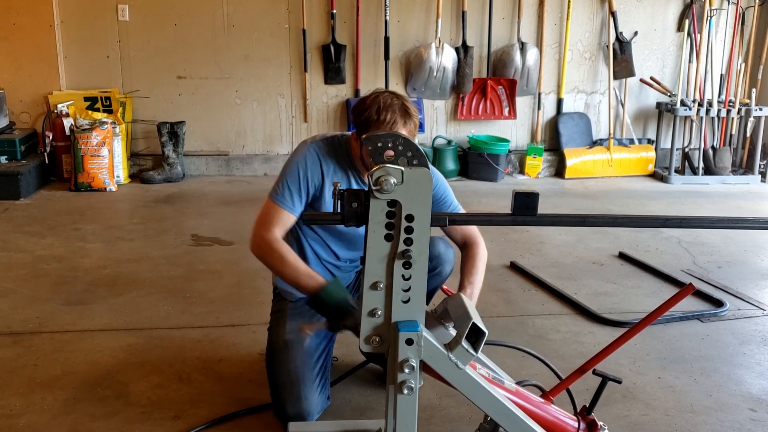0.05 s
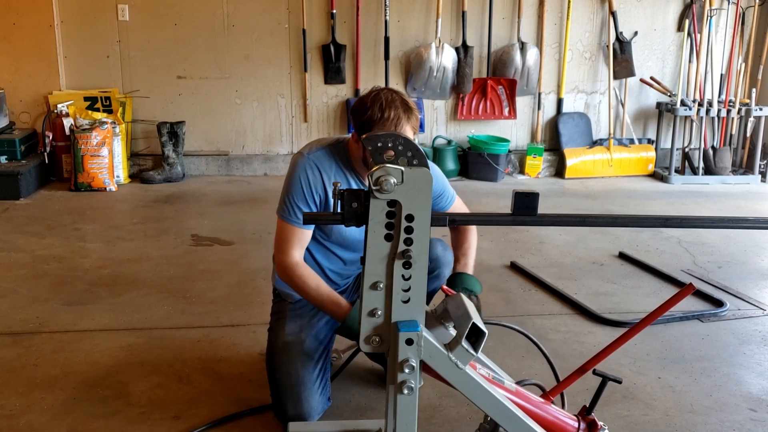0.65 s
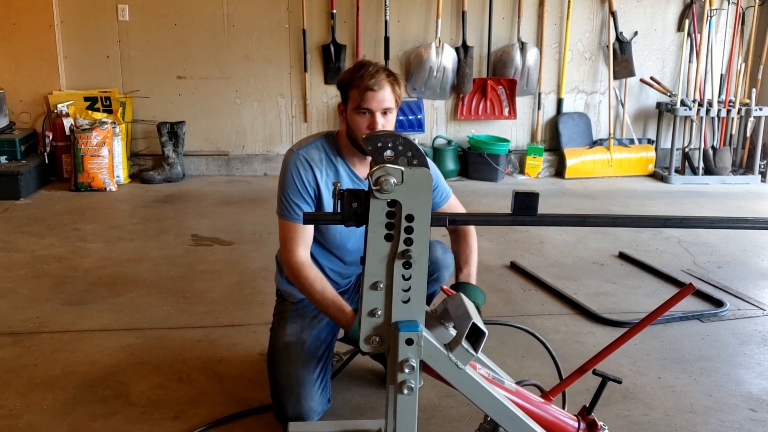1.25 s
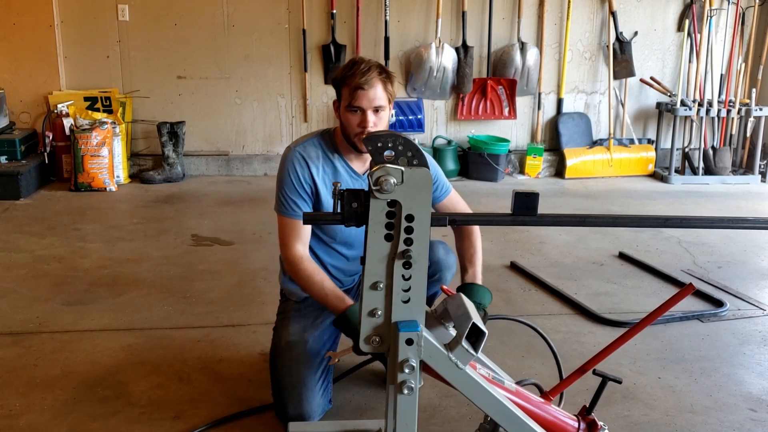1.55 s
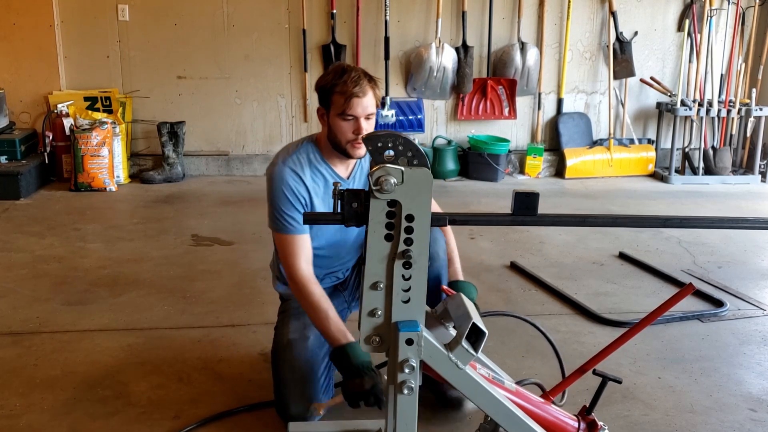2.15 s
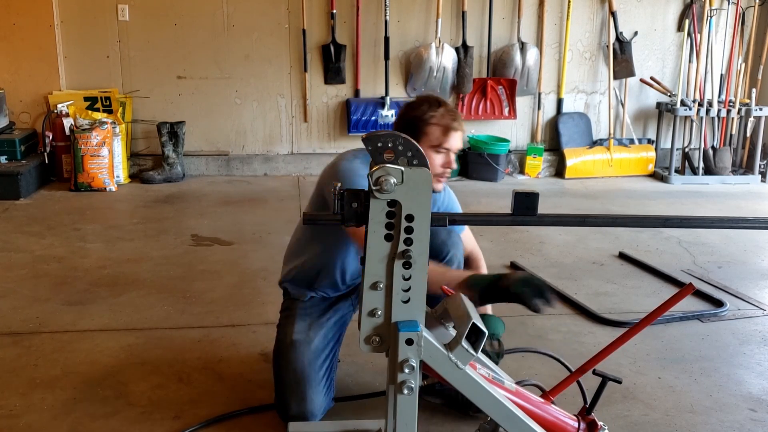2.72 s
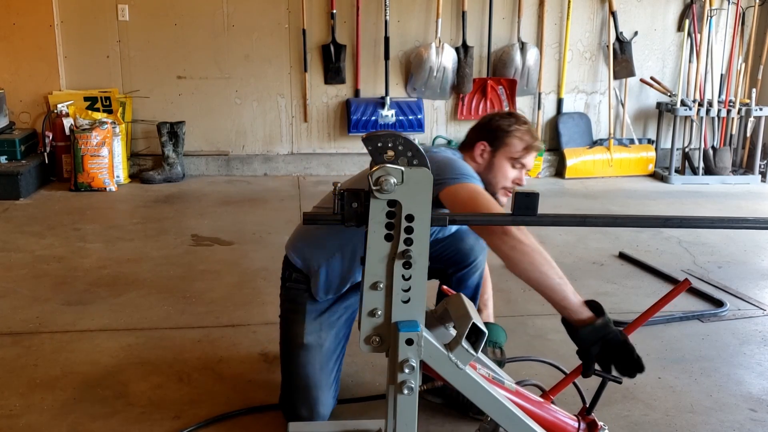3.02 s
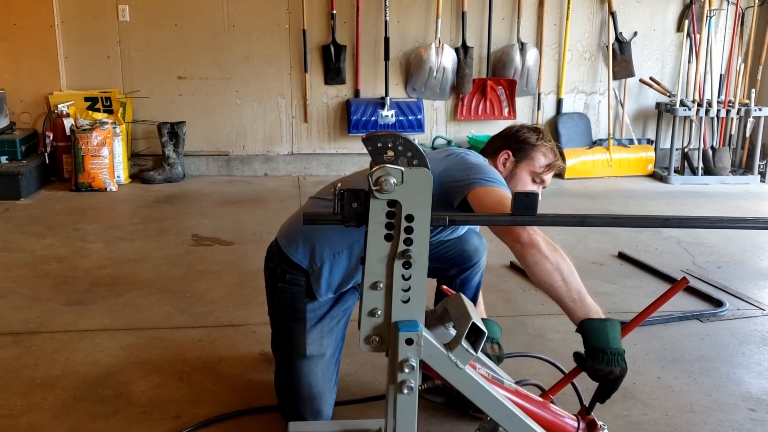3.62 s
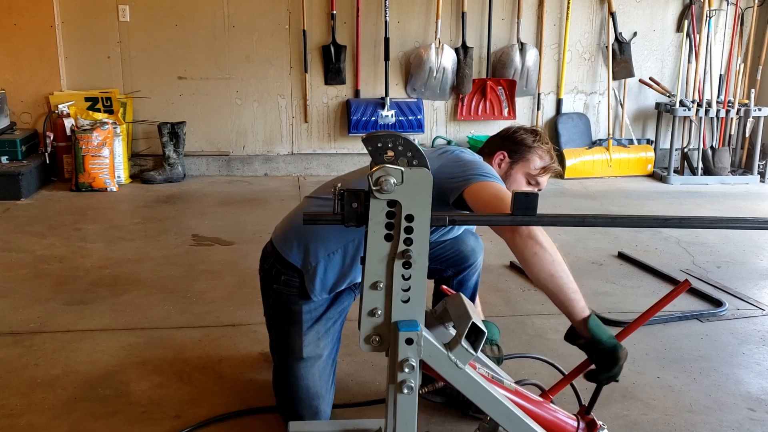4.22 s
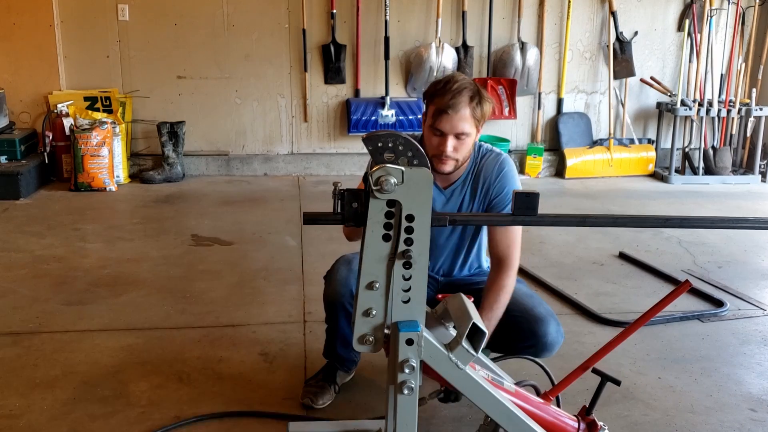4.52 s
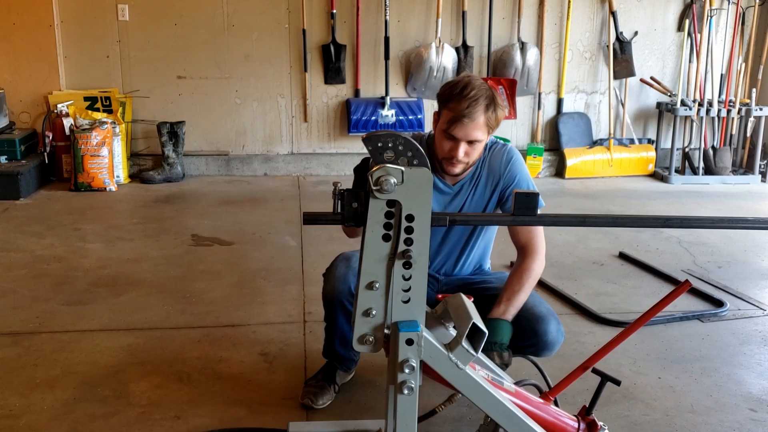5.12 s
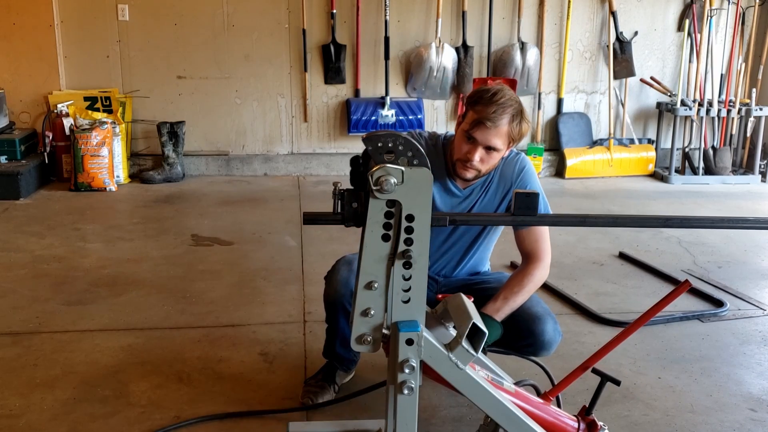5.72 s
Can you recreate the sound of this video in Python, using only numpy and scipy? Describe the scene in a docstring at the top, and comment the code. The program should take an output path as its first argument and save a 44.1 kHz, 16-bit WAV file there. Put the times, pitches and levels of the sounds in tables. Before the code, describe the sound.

Air hisses thinly from a valve, then an air-driven hydraulic pump chatters for half a second with rapid thumps and harsh puffs. A few dull knocks lead into a loud gush of air with a high squeal. A faint leak follows, then a stronger, hollow hiss and a second run of chatter. Everything sits well to the left of the microphone in a garage, over a faint low drone.

```python
"""Air-driven hydraulic pump in a garage

The pump bends steel tube, well to the left. Leaking air hisses at the valve; in two runs the piston
chatters at about twelve strokes a second, each a thump and a puff of turbulent exhaust. Between the
runs the valve vents with a gush and a self-excited squeal. A distant machine drones throughout."""
import sys
import numpy as np
from scipy import signal
from scipy.fft import rfft, irfft, next_fast_len
from scipy.io import wavfile
from scipy.ndimage import map_coordinates

SR = 44100
rng = np.random.default_rng(int(sys.argv[2]) if len(sys.argv) > 2 else 0)


def transcribe(signal):
    """Save signal, clipped to [-1, 1], as a 16-bit WAV file at the path in sys.argv[1]."""
    frames = np.atleast_2d(signal).T
    limited = np.clip(frames, -1, 1)
    pcm = np.round(limited * 32767).astype(np.int16)
    wavfile.write(sys.argv[1], SR, pcm)


N = 262924

# runs of the pump: (air on [s], first stroke [s], air off [s], stroke period [s])
PUMP_RUNS = [(1.462, 1.523, 2.06, 0.0815), (5.242, 5.247, 5.96, 0.0796)]
THROTTLE_S, THROTTLE_END_S = 4.553, 5.25  # the valve is held half open
VENT_S, VENT_END_S = 2.3425, 2.674  # the release valve lets a first stream through
GUSH_S, GUSH_END_S = 2.447, 2.583  # it opens fully
VENT_FALL_DB_PER_S = 105


def pump():
    """Impacts excite resonances: the piston strikes, dumps a turbulent puff and clacks back."""
    # resonances of garage, pump body and returning piston: (frequency [Hz], bandwidth [Hz], gain [dB])
    room_modes = [(58, 21, -4.5), (85, 30, -5), (128, 17.3, -2.5), (157, 48, -6.5), (250.5, 50, -8.5),
                  (381, 67, -13)]
    body_modes = [(6180, 340, -4), (6780, 740, -9.5), (4040, 270, -8.5), (1770, 110, -6.5)]
    return_modes = [(173, 78, -2), (374, 105, -4), (910, 580, -12)]
    # spectra of each puff, its bright jet and the steady exhaust: (frequency [Hz], relative density [dB])
    puff_spectrum = [(500, -11.5), (800, -12), (1150, -3), (1800, 0.5), (2400, -5), (4000, -5.5),
                     (8000, -13.5), (15800, -7)]
    jet_spectrum = [(2000, -28), (4000, -11), (6400, 3), (8300, -2.5), (11000, 0.5), (15500, 2.5)]
    exhaust_spectrum = [(180, -32), (330, 0.5), (450, -5), (740, -4), (1050, -3.5), (1800, -5), (2400, -5),
                        (2900, -2.5), (5200, 0), (6400, 3), (8500, -6.5), (11600, -0.5), (15800, -5)]
    hits = strokes()
    thump = amp(-12.5) * thumps(hz=111, swell=0.0055, delay=0.0012)
    rebound = amp(-23.5) * thumps(hz=124.7, swell=0.013, delay=0.017)
    rebound += amp(-17) * thumps(hz=113.4, swell=0.006, delay=0.0475)
    boom = amp(-25) * bursts(hits, rise=0.019, t60=0.67, hold=0.037) * rush(body(room_modes))
    ping = amp(-15) * bursts(hits, rise=0.00044, t60=0.049, delay=0.0016) * rush(body(body_modes))
    clack = amp(-23.5) * bursts(hits, rise=0.00073, t60=0.07, delay=0.036) * rush(body(return_modes))
    puff = amp(-20.5) * bursts(hits, rise=0.0017, t60=0.25, hold=0.032) * rush(colour(puff_spectrum))
    jet_envelope = amp(-15) * bursts(hits, rise=0.0069, t60=0.33, delay=0.0032, hold=0.019)
    jet = jet_envelope * rush(colour(jet_spectrum))
    flow = motor_air() * rush(colour(exhaust_spectrum))
    sputter = amp(1.06 * wobble(350))
    exhaust = sputter * (amp(0.83 * wobble(25)) * puff + jet + flow)
    return thump + rebound + boom + ping + clack + exhaust


def strokes():
    """Periodic excitation, (time [s], level [dB]): a hard first stroke, then weakening under load."""
    kick_db, tire_db_per_s = 2, 1.3
    return [(s, kick_db * (s == first) - tire_db_per_s * (s - first))
            for _, first, off, period in PUMP_RUNS for s in np.arange(first, off, period)]


def thumps(hz, swell, delay):
    """Volume displacement: each stroke shoves out a slug of air, a pressure swing of a few cycles."""
    out = np.zeros(N + SR)
    t = np.arange(SR // 10) / SR
    envelope = (t / swell * np.exp(1 - t / swell)) ** 2
    for s, db in strokes():
        swing = envelope * np.sin(2 * np.pi * hz * (1 + 0.022 * rng.standard_normal()) * t)
        out[round((s + delay) * SR):][:len(t)] -= amp(db) * swing
    return out[:N]


def motor_air():
    """Pressure-driven flow: the envelope of the motor's air starts at once and sags with the supply."""
    start_db, sag_db_per_s = -19.5, 4.5
    return sum(held(on, off, attack=0.0052, fall_db_per_s=53)
               * amp(start_db - sag_db_per_s * np.maximum(clock() - on, 0))
               for on, _, off, _ in PUMP_RUNS)


def main_tones():
    """Flow-excited modes: the vent sounds three whistles; full flow chokes the lowest, feeds the others."""
    # whistles: (frequency [Hz], left minus right [dB])
    whistles = [(4347, 16), (6374, 13), (6500, 14)]
    # their response to the air: (level [dB], release time [s], change at full flow [dB])
    drive = [(-22.5, 2.755, -10), (-26.5, 2.8, 15.5), (-16.5, 2.707, 5)]
    full = opening(attack=0.023) ** 2
    return sum(amp(db + change_db * full) * held(VENT_S, stop, attack=0.006, fall_db_per_s=95)
               * tone(hz, left_db, scatter=0.57, waver_hz=6, chatter=0.19)
               for (hz, left_db), (db, stop, change_db) in zip(whistles, drive))


def side_tones():
    """Weaker modes share one swell; once the air is spent, damping takes the shortest waves first."""
    # side modes of the valve: (frequency [Hz])
    mode_hz = [1170, 1320, 2631, 3198, 5705, 8614, 8930, 10873, 11809, 12673, 12865, 13302, 15398]
    # for each mode: (level [dB], lag behind the swell [s], left minus right [dB])
    modes = [(-48.5, 0.076, 19), (-40, -0.2, 18), (-32.5, -0.078, 18), (-37.5, 0.17, 16), (-28.5, 0.11, 23),
             (-26.5, 0.081, 10), (-23.5, 0.099, 21), (-20.5, 0.16, 13), (-23, .13, 29), (-22.5, 0.011, 1),
             (-19, 0.024, 10), (-26, .01, 15), (-27.5, 0.2, 23)]
    full_s, fade_s, spent_s = 2.495, 2.658, 2.864
    swell_db_per_s, fade_db_per_s, damping_db_per_s = 29, 82, 200
    t = clock()
    starved_db = 11.5 * np.clip((GUSH_S - t) / 0.02 + 1, 0, 1)  # weaker before the gush
    spent_db = damping_db_per_s * np.maximum(t - spent_s, 0)
    sides = 0
    for hz, (db, lag, left_db) in zip(mode_hz, modes):
        unrest = hz / mode_hz[-1]  # short waves are the least steady
        swell_db = -swell_db_per_s * np.maximum(full_s + lag - t, 0)
        fade_db = -fade_db_per_s * np.maximum(t - lag - fade_s, 0)
        envelope = amp(db + swell_db + fade_db - unrest * starved_db - unrest ** 2 * spent_db)
        sides += envelope * tone(hz, left_db, scatter=0.32 + 0.45 * unrest,
                                 waver_hz=8 * unrest, chatter=0.53 * unrest)
    onset = np.clip((t - 2.35) / 0.017, 0, 1)
    return onset * sides


def tone(hz, left_db, scatter, waver_hz, chatter):
    """Self-excited oscillation: a whistle chatters, and reflections make it flicker at each ear."""
    phase = 2 * np.pi * np.cumsum(hz + waver_hz * wobble(40)) / SR
    flicker = np.array([wobble(55) + 1j * wobble(55), wobble(55) + 1j * wobble(80)])
    modulation = 1 + scatter * flicker + chatter * wobble(260)
    return pan(left_db) * unit(np.real(modulation * np.exp(1j * phase)))


def vent():
    """Cavity resonance: a ragged gush rings the valve, most at full flow, and roughens the squeal."""
    # venting air: (frequency [Hz], relative density [dB])
    spectrum = [(30, -15), (150, -11), (900, -21), (2500, -16.5), (4400, -15.5), (5200, -18), (6400, -11),
                (7700, -20), (10000, -17.5), (12800, -15), (14500, -15), (15800, -17)]
    # cavities of the valve: (frequency [Hz], bandwidth [Hz], gain [dB])
    cavities = [(485, 160, 4.5), (1155, 100, 1), (1960, 180, 3), (2625, 76, 4), (4350, 210, -1)]
    stream = amp(-29) * held(VENT_S, VENT_END_S, attack=0.002, fall_db_per_s=VENT_FALL_DB_PER_S)
    trail = amp(-28.5) * held(GUSH_S, 2.712, attack=0.0025, fall_db_per_s=500)  # until it snaps shut
    flow = np.linalg.norm([stream, trail, amp(-18.5) * opening(attack=0.018)], axis=0)
    gush = rush(colour(spectrum)) + amp(-13.5 + 5 * opening(attack=0.06)) * rush(body(cavities))
    rasp = amp(6.5) * flow / flow.max() * rush(body([(6446, 65, 0)]))  # between the upper whistles
    return flow * (amp(2 * wobble(200)) * gush + rasp)


def opening(attack):
    """Share of the release valve's full flow, 0-1, building up with time constant attack [s]."""
    return held(GUSH_S, GUSH_END_S, attack, fall_db_per_s=VENT_FALL_DB_PER_S)


def leak():
    """Turbulent jet noise: escaping air is a thin seep at low flow, a fuller hiss as the flow grows."""
    # the valve is cracked open: (opens [s], shuts [s], level [dB])
    cracks = [(0, 1.2, -29.5), (0.19, 1.16, -28.5)]
    # the leak at high and at low flow: (frequency [Hz], relative density [dB])
    hiss_spectrum = [(350, -48), (600, -23.5), (1200, -19), (2200, -13.5), (2800, -8.5), (3400, -3),
                     (4100, -5), (5500, -6), (6900, 1.5), (7400, 1), (8100, -11), (11200, -0.5),
                     (13300, 1.5), (15800, -4)]
    seep_spectrum = [(350, -52), (650, -18), (1300, -24.5), (2200, -27), (2900, -7), (3400, -5.5),
                     (5500, -10.5), (6900, -2), (8500, -13.5), (11200, -3.5), (13300, 1.5), (15800, -2.5)]
    seep = amp(-36.5) * held(-1, THROTTLE_S, attack=0.01, fall_db_per_s=400)
    leaks = [amp(db) * held(on, off, attack=0.0089, fall_db_per_s=67) for on, off, db in cracks]
    flow = np.linalg.norm([seep] + leaks, axis=0) * amp(0.59 * wobble(16))
    full = np.clip((20 * np.log10(flow + 1e-9) + 38) / 9, 0, 1)
    return flow * (np.sqrt(full) * rush(colour(hiss_spectrum))
                   + np.sqrt(1 - full) * rush(colour(seep_spectrum)))


def throttle():
    """Flow-excited resonance: the half-open valve blows a hollow note through the stalled motor."""
    # throttled air: (frequency [Hz], relative density [dB])
    spectrum = [(290, -37), (550, -15), (760, -20), (1350, -21), (2300, -17), (3350, -6), (5400, -9.5),
                (6900, 0.5), (8200, -10), (9900, -5), (11400, 3.5), (14000, 0), (15800, -3.5)]
    # resonances of the stalled motor: (frequency [Hz], bandwidth [Hz], gain [dB])
    motor_modes = [(60.4, 21, -2.5), (101, 22.4, -2), (128.6, 20.5, 1.5), (234, 120, -12), (386.4, 20, -7),
                   (767, 226, -17)]
    flow = held(THROTTLE_S, THROTTLE_END_S, attack=0.002, fall_db_per_s=400)
    flow *= amp(-25 + 3.5 * (clock() - THROTTLE_S))  # grows 3.5 dB a second
    return flow * (rush(colour(spectrum)) + amp(-7.5) * rush(body(motor_modes)))


def knocks():
    """Damped impacts: the valve and its handle knock dully and the garage reverberates."""
    # impacts: (time [s], level [dB])
    impacts = [(1.466, -27), (2.227, -23.5), (2.252, -24), (2.339, -25), (4.085, -44), (4.555, -51)]
    # resonances of valve and handle: (frequency [Hz], bandwidth [Hz], gain [dB])
    modes = [(286, 125, -1.5), (450, 180, -1.5), (633, 170, -1), (1300, 500, -37), (3500, 2300, -16)]
    hit = bursts(impacts, rise=0.001, t60=0.039) * rush(body(modes))
    return hit + amp(-8.5) * garage(hit)


def drone():
    """Beating: the close low tones of a distant machine interfere over its rumble."""
    # the drone as heard dips around the squeal, then slowly comes back: (time [s], level [dB])
    contour = [(0, -33), (1.45, -34), (2.2, -38), (2.7, -45), (3.2, -43.5), (4.5, -42.5), (5.96, -39)]
    # its tones: (frequency [Hz], relative level [dB])
    tones = [(57.4, -3), (54.2, -14.5), (89.6, -12.5), (98.8, -10), (149.7, -13), (230, -20.5),
             (304, -26.5)]
    # its rumble: (frequency [Hz], relative density [dB])
    rumble = [(22, -33), (38, -12), (55, -6), (100, -2), (130, -8.5), (180, -13), (300, -17), (500, -24.5),
              (900, -37.5), (2000, -74)]
    hum = sum(amp(db) * np.sqrt(2) * np.sin(2 * np.pi * hz * clock() + 0.5 * wobble(3.77))
              for hz, db in tones)
    gain = amp(np.interp(clock(), *np.transpose(contour)))
    return gain * (hum + amp(-6.5) * rush(colour(rumble)))


def walls(x, echo_db, count=8):
    """Comb filtering: early echoes from floor, frame and walls interfere differently at each ear."""
    delays = rng.uniform(0.002, 0.024, (count, 2, 1))
    def comb(hz):
        echo = amp(echo_db) * hz ** 2 / (hz ** 2 + 600 ** 2)  # long waves bend round the objects
        return (1 + echo * np.exp(-2j * np.pi * hz * delays).sum(0)) / np.sqrt(1 + count * echo ** 2)
    return filtered(x, comb)


def garage(x):
    """Reverberation: the diffuse field between concrete floor and bare walls decays exponentially."""
    # decay of the room: (frequency [Hz], reverberation time [s])
    t60 = [(100, .6), (1000, .6), (6000, 0.64), (15000, 0.33)]
    hz, t, noise = signal.stft(rng.standard_normal((2, SR // 2)), SR, nperseg=256)
    tail = signal.istft(noise * amp(-60 * t / along(t60, hz)[:, None]), SR, nperseg=256)[1]
    return signal.fftconvolve(x, tail / np.linalg.norm(tail[0]), axes=1)[:, :N]


def rush(response):
    """Partial coherence: stereo noise of rms 1, alike in the bass and diffuse in the treble."""
    # likeness of left and right: (frequency [Hz], correlation [-1 to 1])
    coherence = [(60, 0.96), (130, 1), (290, 0.57), (640, 0.53), (1410, 0.43), (3100, 0.063),
                 (6820, -0.035), (15000, -0.084)]
    def mid_side(hz):
        angle = np.arccos(np.clip(along(coherence, hz), -1, 1)) / 2
        return response(hz) * np.array([np.cos(angle), np.sin(angle)])
    mid, side = filtered(rng.standard_normal((2, N)), mid_side)
    return unit(np.array([mid + side, mid - side]))


def bursts(events, rise, t60, delay=0, hold=0):
    """Incoherent sum: envelopes of (time [s], level [dB]) events rise, hold, decay and add in power."""
    power = np.zeros(N + SR)
    t = np.arange(SR // 2) / SR
    shape = (1 - np.exp(-t / rise)) * amp(-60 * np.maximum(t - hold, 0) / t60)
    for s, db in events:
        power[round((s + delay) * SR):][:len(t)] += (amp(db) * shape) ** 2
    return np.sqrt(power[:N])


def held(start, stop, attack, fall_db_per_s):
    """Exponential relaxation: a stream rises to 1, holds while the valve is open, and dies away."""
    t = clock()
    rise = 1 - np.exp(-np.maximum(t - start, 0) / attack)
    return rise * amp(-fall_db_per_s * np.maximum(t - stop, 0))


def body(modes):
    """Modal superposition: causal response of (frequency [Hz], bandwidth [Hz], gain [dB]) resonances."""
    return lambda f: sum((-1) ** k * amp(db) * 1j * f * width / (hz * hz - f * f + 1j * f * width)
                         for k, (hz, width, db) in enumerate(modes))


def colour(points):
    """Spectral envelope through (frequency [Hz], gain [dB]) points."""
    return lambda hz: amp(along(points, hz))


def filtered(x, response):
    """Linear filtering: the spectrum of x times a complex response."""
    size = next_fast_len(N + SR // 2)
    return irfft(rfft(x, size) * response(np.fft.rfftfreq(size, 1 / SR)), size)[..., :N]


def pan(left_db):
    """Level difference between the ears: left and right gains whose mean is 1."""
    ratio = amp(np.atleast_1d(left_db))
    return np.array([2 * ratio, 2 + 0 * ratio]) / (1 + ratio)


def wobble(rate):
    """Smooth random modulation, rate knots a second."""
    return map_coordinates(rng.standard_normal(int(N * rate / SR) + 4), [clock() * rate])


def along(points, hz):
    """Interpolate (frequency [Hz], value) points on a log axis."""
    freqs, values = np.transpose(points)
    return np.interp(np.log(hz + 1), np.log(freqs + 1), values)


def amp(db):
    """Decibels to gain."""
    return 10 ** (np.asarray(db) / 20)


def unit(x):
    """Scale to rms 1."""
    return x / np.sqrt(np.mean(np.abs(x) ** 2) + 1e-20)


def clock():
    """Time [s] of every sample."""
    return np.arange(N) / SR


def scene():
    """Superposition: the sources add, and level differences place them well to the left."""
    # balance of all but the squeal: (frequency [Hz], left minus right [dB])
    balance = [(60, 13), (130, 12), (700, 14), (1400, 13), (2500, 18.5), (3500, 15), (5000, 15.5),
               (7000, 23.5), (8300, 11.5), (10500, 10.5), (13000, 7), (15800, 27)]
    machines = walls(pump() + leak() + throttle() + vent() + knocks(), echo_db=-17.5) + drone()
    squeal = main_tones() + side_tones()
    return filtered(machines, lambda hz: pan(along(balance, hz))) + squeal


def record(dry):
    """Clipping and band limiting: peaks flatten at full scale and the highest treble is cut."""
    top_hz = 15830
    return filtered(np.clip(dry, -1, 1), lambda hz: hz < top_hz)


dry = scene()
out = record(dry)
transcribe(out)
```